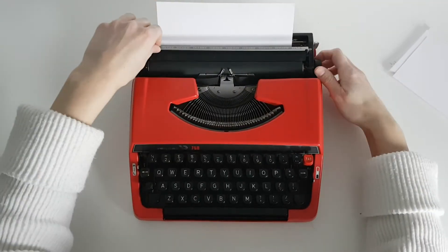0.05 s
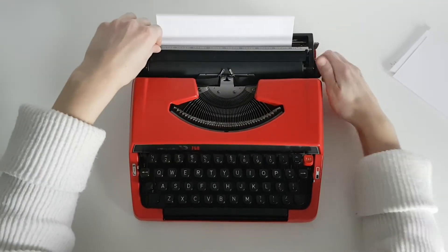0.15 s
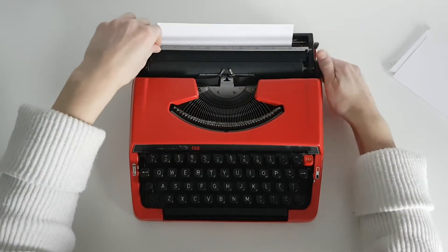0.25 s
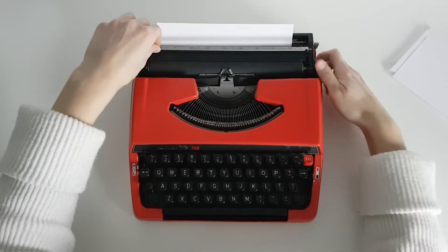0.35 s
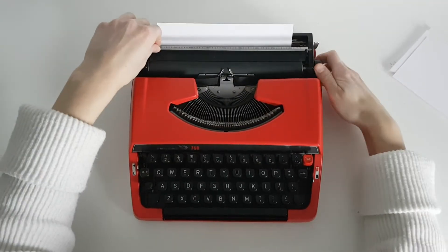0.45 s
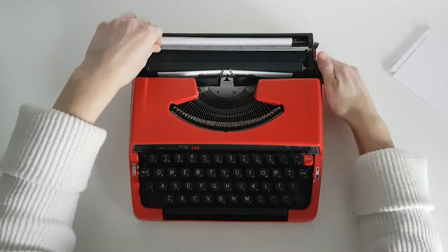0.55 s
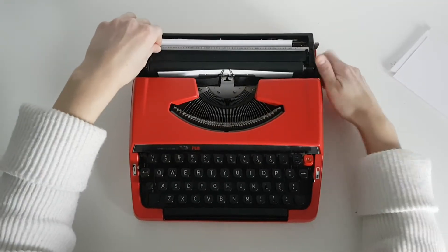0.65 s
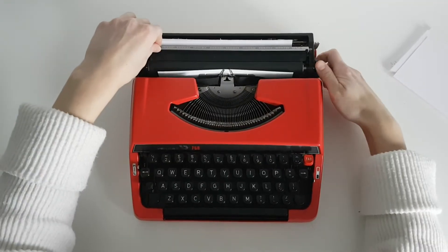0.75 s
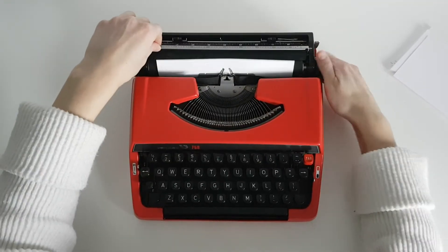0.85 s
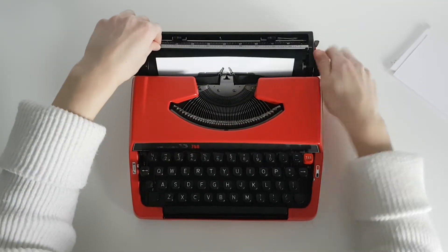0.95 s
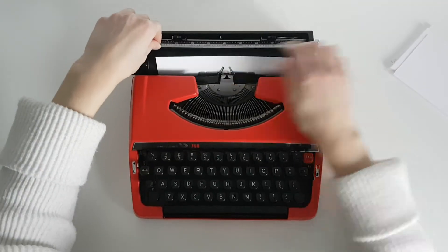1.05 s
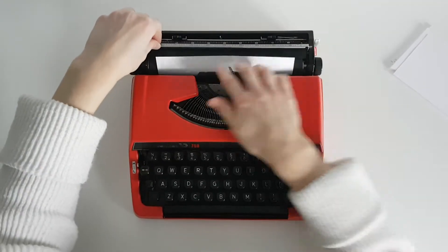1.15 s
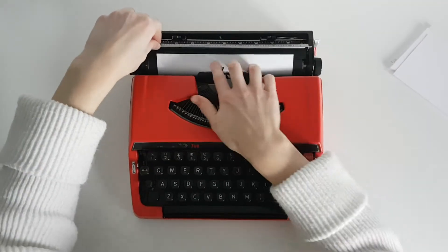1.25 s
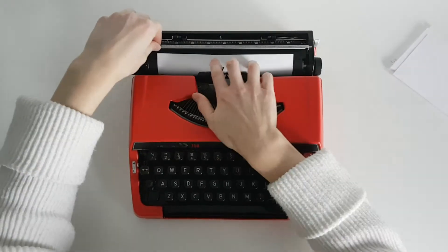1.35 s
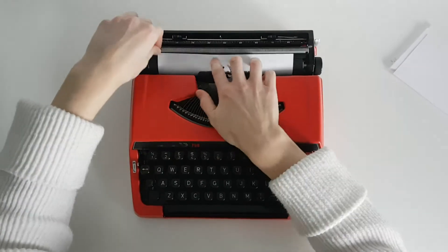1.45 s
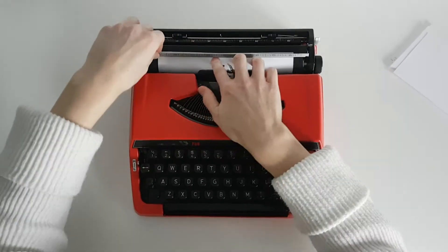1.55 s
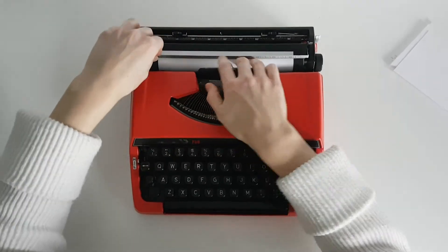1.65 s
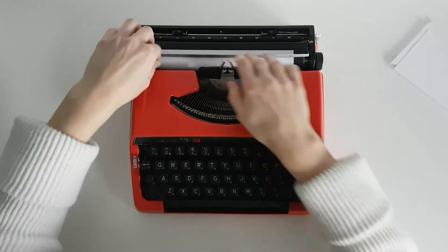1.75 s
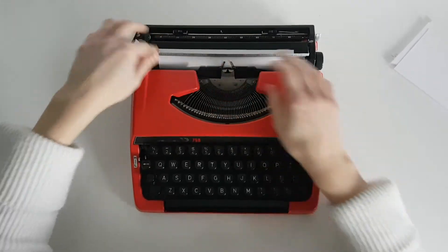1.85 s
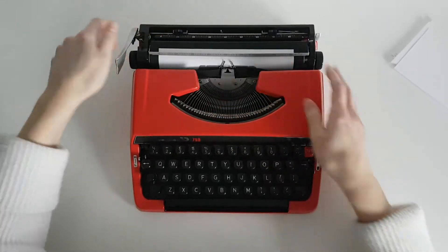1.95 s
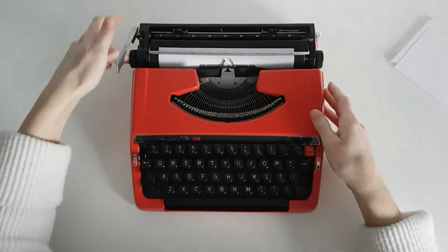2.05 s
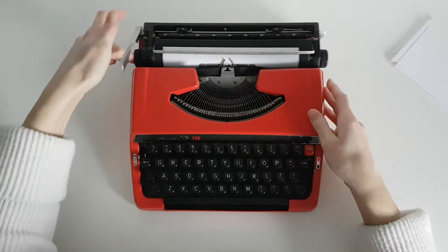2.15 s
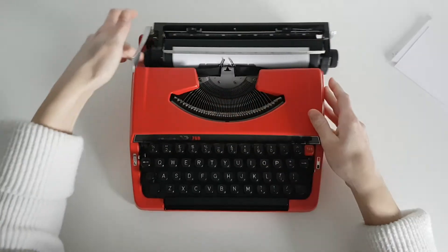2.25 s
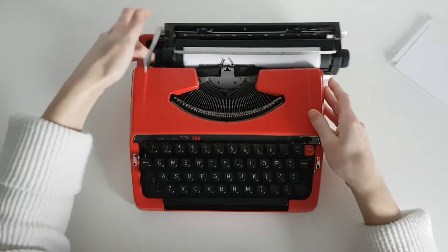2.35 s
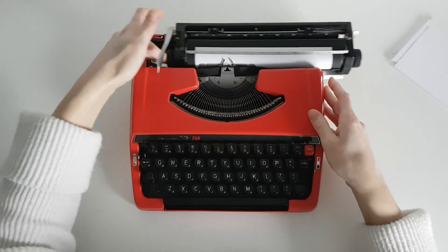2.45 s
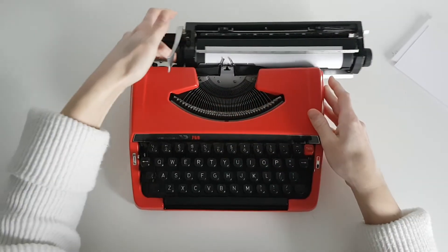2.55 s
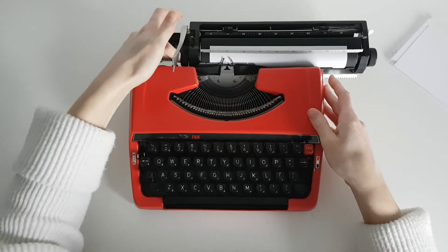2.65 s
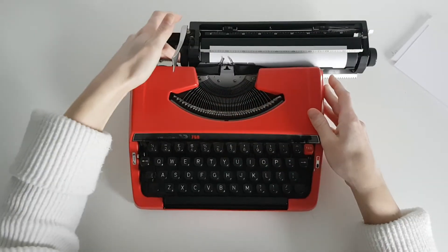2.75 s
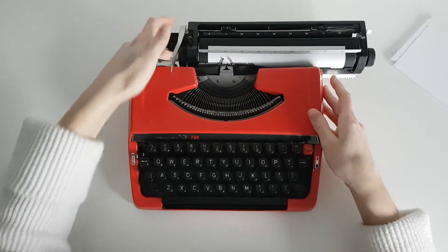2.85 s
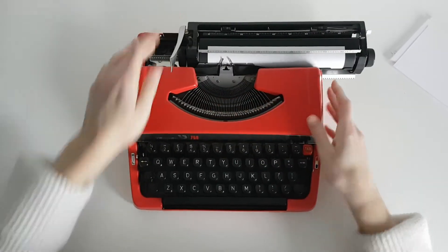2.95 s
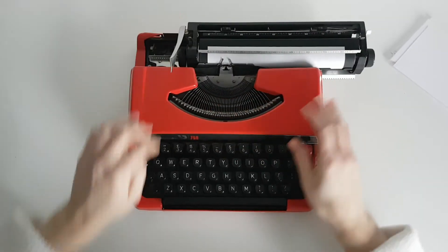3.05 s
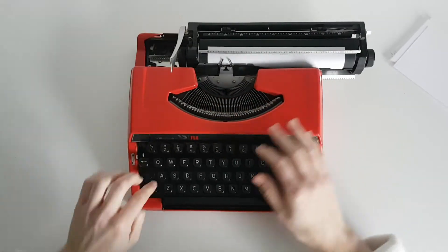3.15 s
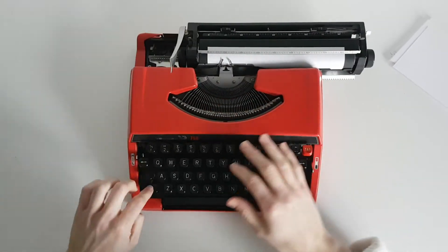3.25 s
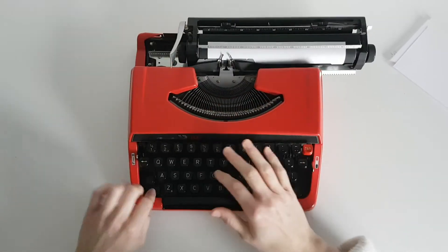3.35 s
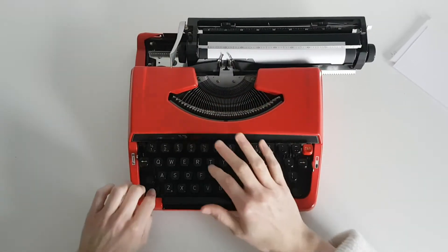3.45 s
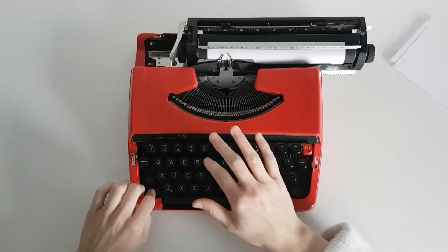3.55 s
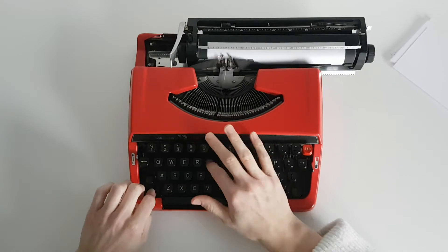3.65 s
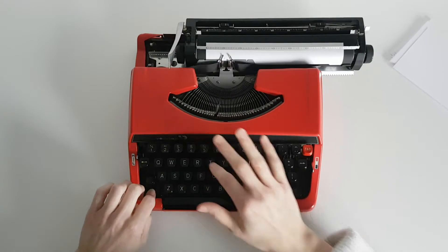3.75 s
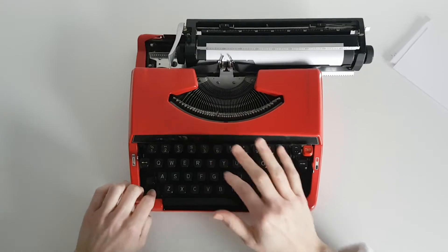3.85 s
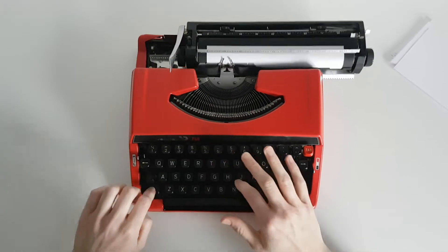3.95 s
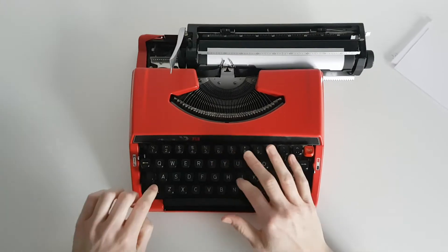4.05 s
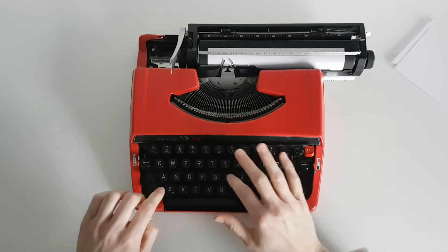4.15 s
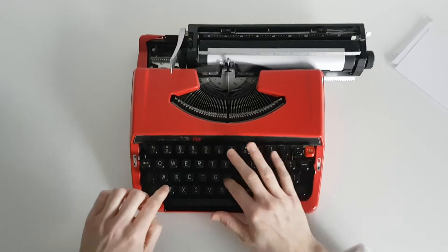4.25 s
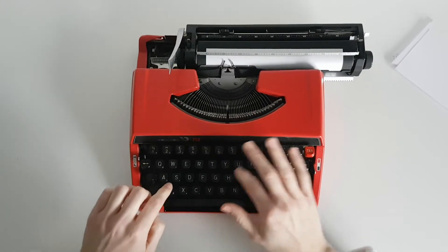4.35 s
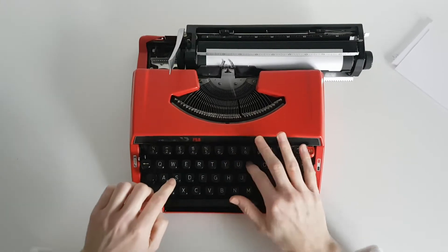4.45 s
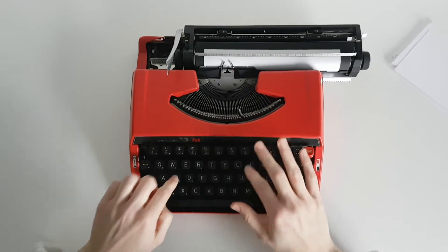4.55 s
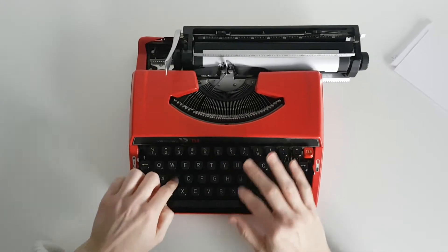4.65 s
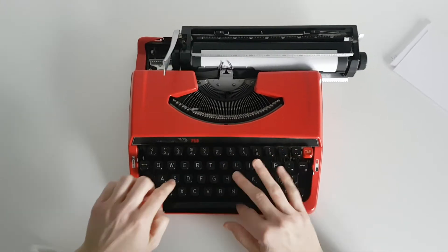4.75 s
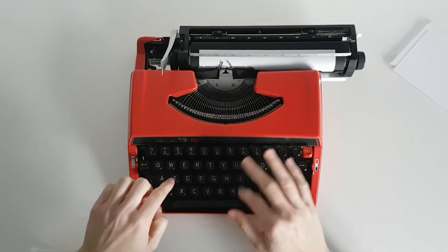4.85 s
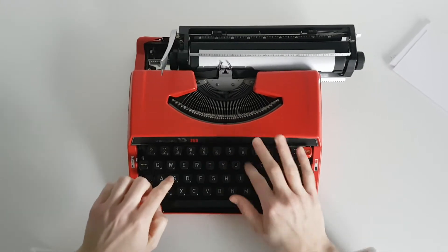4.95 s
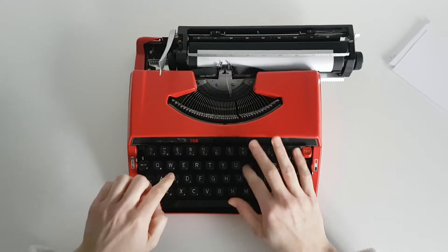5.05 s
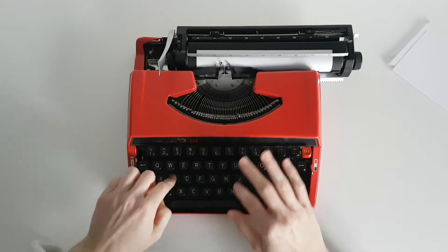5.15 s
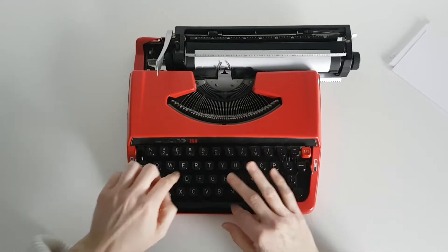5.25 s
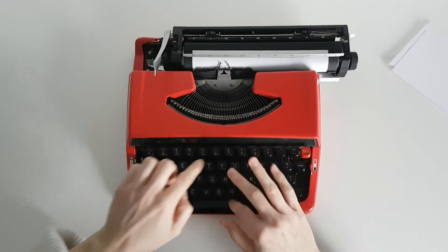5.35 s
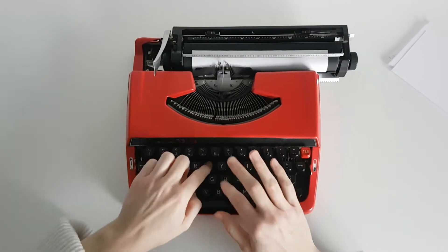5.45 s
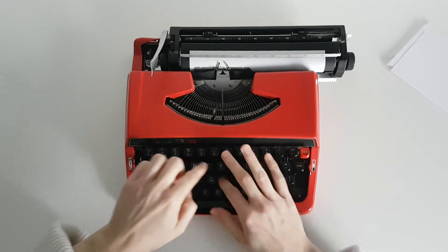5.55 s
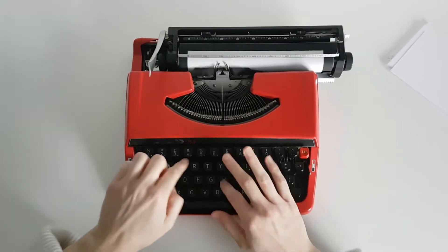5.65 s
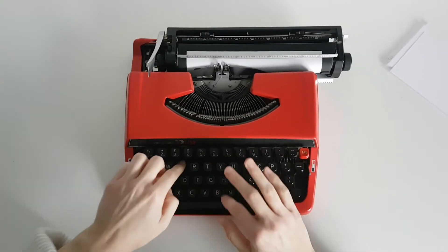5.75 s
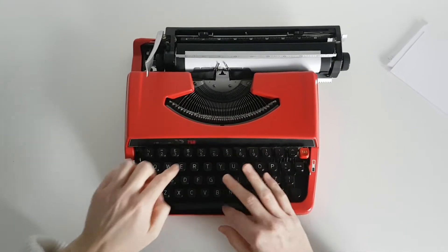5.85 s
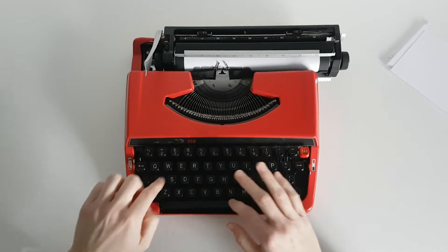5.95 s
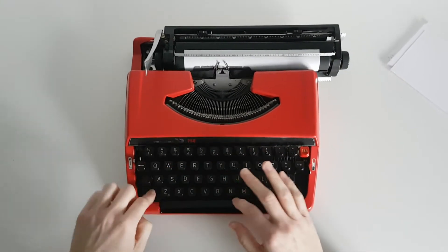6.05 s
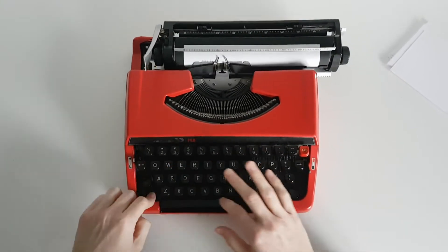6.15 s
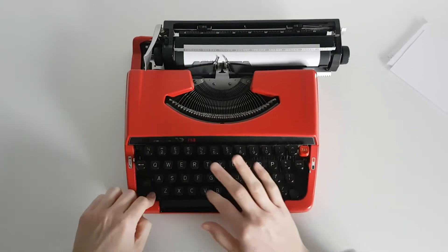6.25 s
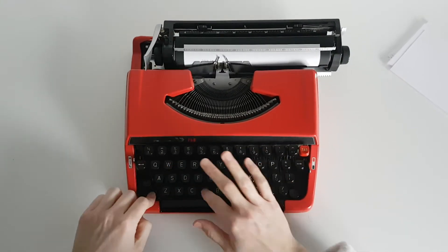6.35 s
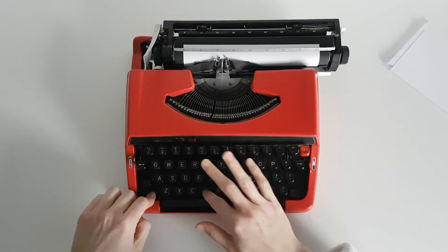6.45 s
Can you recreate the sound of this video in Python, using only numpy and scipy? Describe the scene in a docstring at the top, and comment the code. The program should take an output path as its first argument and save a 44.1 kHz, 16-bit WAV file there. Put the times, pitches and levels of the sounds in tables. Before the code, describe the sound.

Small room, close stereo microphone, faint air. Paper is rolled into a manual typewriter with three soft, rapid clicking twists, then sparse delicate taps of metal fittings and a quiet purring carriage slide. A heavy shift clunk starts the typing: one duller strike, a low desk thud, then eight sharp slaps at irregular spacing, with linkage rattle and woody metallic return knocks. Space bar clatters separate them; another shift clunk precedes one final hard strike.

```python
"""A small room with a portable manual typewriter on a desk, heard from close above.
Three twists of the platen knob click a pawl over ratchet teeth above a filtered-noise rumble, then the
paper bail is set and the carriage purrs along its rack to the margin. The shift key jolts a ringing
carriage. A run of letters follows, with spaces: noise-burst linkage rattles, a cracking slap on the
platen, then a ringing knock as the typebar falls back. Frame resonances and a short room bind it all."""
import sys
import numpy as np
from scipy import signal
from scipy.fft import rfft, irfft
from scipy.io import wavfile

SR = 44100
rng = np.random.default_rng(int(sys.argv[2]) if len(sys.argv) > 2 else 0)


def generate_wav(signal):
    """Clip the signal to [-1, 1] and save it as 16-bit WAV at the path in sys.argv[1]."""
    frames = np.transpose(np.atleast_2d(signal))
    scaled = np.clip(frames, -1, 1) * 32767
    pcm = np.round(scaled).astype(np.int16)
    wavfile.write(sys.argv[1], SR, pcm)


N = 286209
T = np.arange(SR // 3) / SR  # time axis of one short sound, s

# Levels in the event tables are relative: each layer adds its own trim and colour.
# twists of the platen knob: start t/s, length/s, level/dB, opening rate/teeth per s, rise/s
TWISTS = [(.151, .13, -28.5, 132, 0.023), (0.513, 0.12, -30, 122, .002), (0.8435, .08, -28.5, 130, .002)]
# letters: typebar hit t/s, hit level/dB, linkage level/dB, fall-back delay/s, landing level/dB
LETTERS = [(3.703, -24, -37.5, 0.064, -18.5), (4.2732, -10.5, -36, .089, -15),
           (4.495, -11, -36, 0.076, -17.5), (4.6457, -9, -29.5, 0.107, -23.5),
           (5.022, -12, -35.5, 0.0854, -17), (5.1847, -10.5, -29, 0.096, -22.5),
           (5.4834, -12, -36.5, .083, -17.5), (5.6072, -10, -36, 0.087, -16),
           (5.7448, -10.5, -35.5, 0.089, -22.5), (6.4314, -9, -34.5, .09, -19)]
# the space bar springs back: t/s, level/dB
SPACE_RELEASES = [(4.856, -26), (5.371, -26.5), (5.941, -26)]
# the shift key lifts the carriage against its stop: t/s, level/dB
SHIFT_LIFTS = [(3.393, -15.5), (6.158, -13)]
# the shift key lets the carriage drop, one row: t/s, level/dB
SHIFT_DROP = (4.0, -18.5)
# knocks of paper bail, carriage, lever and other loose fittings: t/s, level/dB, f/Hz of the fitting
FITTING_KNOCKS = [(1.234, -50, 1700), (1.265, -48.5, 780), (1.39, -60.5, 10000), (1.541, -47.5, 2200),
                  (1.562, -38.5, 1900), (1.687, -50.5, 2410), (2.131, -50, 3380), (2.652, -34.5, 3030),
                  (2.68, -39, 560), (2.863, -40.5, 4000), (2.955, -49.5, 1530), (3.288, -54.5, 278),
                  (3.369, -43.5, 1600), (4.422, -35, 2800), (6.079, -46, 6930)]
# a dry snap of the paper, one row: t/s, level/dB
PAPER_SNAP = (0.415, -42)
# hands resting on the machine make it rumble faintly, one row: start t/s, length/s, level/dB
HANDS_ON = (0, .98, -54.5)

# spectra, each scaled to unit energy in use: f/Hz, level/dB
# slug on platen
SLAP_SPECTRUM = [(60, -6.5), (400, -10.5), (900, -9.5), (1600, -3.5), (3800, 0.5), (5000, -9), (7300, -9.5),
                 (9000, -20), (12000, -17), (16000, -30)]
# typebar on its rest
REST_SPECTRUM = [(60, 0.5), (350, -8.5), (700, -3), (1100, -2), (2800, -4), (4200, -15.5), (7500, -22.5),
                 (9500, -28.5), (15000, -22.5)]
# key linkage
LINKAGE_SPECTRUM = [(60, 9.5), (350, 1.5), (1000, -1), (3800, -1), (6500, -4.5), (9500, -11), (15000, -6)]
# space bar and escapement
SPACE_SPECTRUM = [(60, 3.5), (350, 1), (600, 1), (1100, 1), (1900, -6.5), (4300, -4), (6000, -15.5),
                  (8000, -12), (9800, -26), (14000, -19.5)]
# shifted carriage
CARRIAGE_SPECTRUM = [(60, 3), (230, 7), (350, -1), (700, 1.5), (1400, -2), (2000, -5.5), (3700, -6),
                     (6000, -15), (9500, -21.5), (13000, -20)]
# pawl on the platen ratchet
PAWL_SPECTRUM = [(100, 3), (400, -6.5), (1100, -2), (1700, -9.5), (2400, -0.5), (3000, -7), (4400, -5.5),
                 (5500, -3), (8500, -11), (13000, -9)]
# touched fittings
TOUCH_SPECTRUM = [(60, 3.5), (200, 7.5), (400, 0.5), (1500, 2.5), (3400, -2.5), (5500, -7), (9500, -13),
                  (12500, -15.5)]
# snapping paper
PAPER_SPECTRUM = [(100, -25), (8000, -17), (12000, 8), (16000, -14)]
# pawl on the carriage rack
RACK_SPECTRUM = [(80, 12), (400, -4), (900, 1.5), (2000, -1.5), (3000, 4), (4500, -11.5), (10000, -27.5)]
# rolling parts and the thud under a knock
RUMBLE_SPECTRUM = [(25, -20), (75, 4), (140, -4.5), (280, -9), (600, -24), (3000, -48)]
# still air
AIR_SPECTRUM = [(25, -9.5), (70, 3), (200, -8), (1000, -15), (3200, -18), (9000, -37), (15000, -29.5)]

# ringing of a landed typebar, before its own pitch factor: f/Hz, level/dB, t60/s
REST_MODES = [(1037, -2.5, 0.066), (1610, -1, 0.013)]
# ringing of the carriage against its stop: f/Hz, level/dB, t60/s
STOP_MODES = [(68, -1, .13), (185, -8, .09), (235, -6, .09), (562, 7.5, .06)]
# ringing of the dropped carriage through the desk: f/Hz, level/dB, t60/s
DROP_MODES = [(66.36, -4.5, .15), (85.64, 0, 0.145), (138, -3.5, 0.068), (225, -6.5, 0.116)]
# resonances of the frame, fed by every contact: f/Hz, width/Hz, boost/dB
FRAME_RESONANCES = [(68.5, 5.33, -1.5), (81.5, 8.3, -1), (143.2, 12.3, -3), (200.6, 58, -6), (575, 14, 3.5),
                    (720.5, 35.1, -0.5), (1065, 27, -1)]
# resonances of the ratchet wheel: f/Hz, width/Hz, boost/dB
WHEEL_RESONANCES = [(1100, 130, 2), (3740, 260, 11), (5400, 500, -3)]
# room decay: f/Hz, t60/s
ROOM_DECAY = [(60, 0.49), (400, 0.48), (1100, 0.4), (3000, 0.3065), (7700, 0.32), (15000, 0.19)]
# stereo width: f/Hz, side gain level/dB
SIDE_GAIN = [(60, -15.5), (150, -19), (300, -10.5), (600, -10), (1300, -3), (2700, -3), (5000, 0),
             (15000, 0.5)]

AIR_DB, EDGE_HZ = -62.5, 16200  # still air; upper band limit
TWIST_SLOWING, TWIST_FADE_DB = 0.22, -13.5  # share of rate and level lost by the end of a twist
# the knob ticks as the fingers let go after a twist starts, and grip again before the next
LET_GO_S, GRIP_S, KNOB_DB, KNOB_HZ = 0.175, 0.023, -53, 2980
# rumble of the turning platen; every rolling part rises and runs on alike
PLATEN_ROLL_DB, ROLL_RISE_S, ROLL_T60_S = -43.5, 0.035, 0.31
PUSH_S, PUSH_LENGTH_S, PUSH_ROLL_DB = 2.15, 0.47, -55  # the carriage is pushed to its margin
SLIDE_DB, SLIDE_TEETH_PER_S = -50, 72  # its pawl on the rack
# share of the push at which the slide is loudest; level of its two ends against that peak
SLIDE_PEAK, SLIDE_START_DB, SLIDE_END_DB = 0.58, -12, -7.5
KEY_TRAVEL_S = 0.0375  # from pressing a key to the hit
HARD_DB, SOFT_DB = -12, -28  # table levels of a clean crack and of a dull rattle
LANDING_TILT_DB = 0.6  # brightness of a landing typebar, dB per octave
SPACE_HELD_S, SPACE_PRESS_DB = 0.076, -6.5  # the press comes this much earlier and softer
# small fittings are brighter: dB per octave for each octave of pitch above FITTING_HZ
FITTING_HZ, FITTING_TILT_DB = 2200, 0.96
THUD_DB, THUD_T60_S = -10.5, 0.28  # each knock also jogs the carriage


def amp(db):
    """Decibels to gain."""
    return 10 ** (np.asarray(db) / 20)


def read(points, hz):
    """Reads a value from a table of (f/Hz, value) on a log-frequency axis."""
    f, value = np.transpose(points)
    return np.interp(np.log(hz + 1), np.log(f), value)


def add(mix, s, sound):
    """Mixes a mid-side sound in at s seconds."""
    part = mix[:, max(round(s * SR), 0):][:, :sound.shape[1]]
    part += sound[:, :part.shape[1]]


def fade(t60, t=T):
    """Exponential decay that falls by 60 dB in t60 seconds."""
    return np.exp(-np.log(1000) * t / t60)


def clatter(shape):
    """Countless small parts sounding together: noise under an envelope, equal in mid and side."""
    noise = rng.standard_normal((2, len(shape))) * shape
    return noise * np.linalg.norm(shape) / np.linalg.norm(noise, axis=1, keepdims=True)


def colour(x, spectrum, tilt_db=0, size=2048):
    """Minimum-phase filter of unit energy with the given spectrum, tilted in dB per octave."""
    hz = abs(np.fft.fftfreq(size, 1 / SR))
    gain = amp(read(spectrum, hz) + tilt_db * np.log2(np.clip(hz, 100, 8000)))
    gain = gain / np.sqrt(np.mean(gain ** 2))
    response = np.exp(signal.hilbert(np.log(gain)).conj())
    taps = np.fft.ifft(response).real[:size // 2]
    return signal.fftconvolve(x, taps[None], axes=1)[:, :x.shape[1]]


def resonate(x, modes):
    """Parts ring on at their own pitches after whatever shakes them; wider modes die sooner."""
    rings = 0
    for hz, width, db in modes:
        decay = np.exp(-np.pi * width * T)
        rings = rings + amp(db) * 2 * np.pi * width / SR * decay * np.cos(2 * np.pi * hz * T)
    return x + signal.fftconvolve(x, rings[None], axes=1)[:, :x.shape[1]]


def ring(modes, pitch=1, rise=0.00744):
    """Damped sines of one struck part, swelling briefly, in the middle of the image."""
    mid = sum(amp(db) * fade(t60) * np.sin(2 * np.pi * hz * pitch * T) for hz, db, t60 in modes)
    return np.array([mid * (1 - fade(rise)), 0 * mid])


def ratchet(rows, spectrum, tooth_t60, uneven_db):
    """A pawl drops into one tooth after another at the speed of the hand."""
    s, rate, db = np.transpose(rows)
    t = np.arange(s[0], s[-1], 1 / SR)
    teeth = np.floor(np.cumsum(np.interp(t, s, rate)) / SR)
    out = np.zeros((2, N))
    for at in t[np.diff(teeth, prepend=-1) > 0]:
        size = amp(np.interp(at, s, db) + uneven_db * rng.standard_normal())
        add(out, at, size * clatter(fade(tooth_t60)[:SR // 20]))
    return colour(out, spectrum)


def still_air():
    """Steady coloured noise beneath everything."""
    return amp(AIR_DB) * colour(clatter(np.ones(N)), AIR_SPECTRUM)


def rolling(start, length, db):
    """Envelope of a rumble: it builds up, holds while the part moves and dies away."""
    t = np.arange(N) / SR - start
    return amp(db) * np.clip(t / ROLL_RISE_S, 0, 1) * fade(ROLL_T60_S, np.maximum(t - length, 0))


def rumble():
    """Resting hands, the turning platen and the moving carriage shake the body: low noise."""
    level = rolling(*HANDS_ON) + rolling(PUSH_S, PUSH_LENGTH_S, PUSH_ROLL_DB)
    for start, length, *_ in TWISTS:
        level = level + rolling(start, length, PLATEN_ROLL_DB)
    return amp(-7) * colour(clatter(level), RUMBLE_SPECTRUM)


def room(x, gap_s=0.0033, thin_hz=110):
    """Dense reflections build up after a short gap; treble dies first and little bass comes back."""
    hz, t, z = signal.stft(rng.standard_normal((2, SR // 2)), SR, nperseg=256)
    tail = signal.istft(z * fade(read(ROOM_DECAY, hz)[:, None], t), SR, nperseg=256)[1]
    after_gap = np.maximum(np.arange(tail.shape[1]) / SR - gap_s, 0)
    tail = tail * (1 - fade(0.014, after_gap))
    tail = signal.lfilter(*signal.butter(1, thin_hz, "high", fs=SR), tail)
    return signal.fftconvolve(x[:1], tail / np.linalg.norm(tail[0]), axes=1)[:, :N]


def twist(start, length, db, rate, rise):
    """One turn of the wrist as (t/s, teeth per s, level/dB): quick, then slower and softer."""
    u = np.linspace(0, 1, 30)  # share of the twist
    swell_db = -8 * np.maximum(1 - u * length / rise, 0)
    level_db = db + swell_db + TWIST_FADE_DB * u ** 2
    return np.transpose([start + u * length, rate * (1 - TWIST_SLOWING * u), level_db])


def platen_clicks():
    """The platen clicks round as its pawl drops over the teeth of a ringing ratchet wheel."""
    clicks = sum(ratchet(twist(*row), PAWL_SPECTRUM, tooth_t60=0.0354, uneven_db=2) for row in TWISTS)
    return amp(-3) * resonate(clicks, WHEEL_RESONANCES)


def handling(width=0.35, boost_db=5):
    """Light knocks on loose fittings, each with a short ring at its own pitch and a soft thud."""
    let_go = [start + LET_GO_S for start, *_ in TWISTS]
    grip_again = [start - GRIP_S for start, *_ in TWISTS[1:]]
    knob_ticks = [(s, KNOB_DB, KNOB_HZ) for s in let_go + grip_again]
    out = np.zeros((2, N))
    for s, db, hz in FITTING_KNOCKS + knob_ticks:
        tilt_db = FITTING_TILT_DB * np.log2(hz / FITTING_HZ)
        shape = fade(0.043) + amp(-11.5) * fade(0.136)
        knock = colour(clatter(shape), TOUCH_SPECTRUM, tilt_db)
        thud = colour(clatter(fade(THUD_T60_S)), RUMBLE_SPECTRUM)
        add(out, s, amp(db - 3) * resonate(knock, [(hz, width * hz, boost_db)]))
        add(out, s, amp(db + THUD_DB) * thud)
    return out


def paper_snap():
    """The sheet snaps: one very short burst of bright noise."""
    out = np.zeros((2, N))
    s, db = PAPER_SNAP
    add(out, s, amp(db) * colour(clatter(fade(0.0095)), PAPER_SPECTRUM))
    return out


def push():
    """One push of the carriage as (t/s, teeth per s, level/dB): it swells, then is eased off."""
    shape = (0, SLIDE_START_DB), (SLIDE_PEAK, 0), (1, SLIDE_END_DB)
    return [(PUSH_S + u * PUSH_LENGTH_S, SLIDE_TEETH_PER_S, SLIDE_DB + db) for u, db in shape]


def carriage_slide():
    """The carriage purrs to its margin as a pawl runs along the rack."""
    return amp(-1) * ratchet(push(), RACK_SPECTRUM, tooth_t60=0.071, uneven_db=1.5)


def shift(travel_s=0.0096):
    """The carriage is jerked up and rings against its stop; let go, it thuds through the desk."""
    out = np.zeros((2, N))
    jolt = (1 - fade(0.016)) * fade(0.17)
    for s, db in SHIFT_LIFTS:
        add(out, s, amp(db - 7) * colour(clatter(jolt), CARRIAGE_SPECTRUM))
        stop = colour(clatter(jolt), CARRIAGE_SPECTRUM, tilt_db=-1)
        add(out, s + travel_s, amp(db - 7) * (ring(STOP_MODES) + amp(-1) * stop))
    s, db = SHIFT_DROP
    drop = colour(clatter(jolt), CARRIAGE_SPECTRUM, tilt_db=0.97)
    add(out, s, amp(db) * (drop - ring(DROP_MODES)))
    return out


def letters(rebound_s=0.0052, rebound_db=-8, crack=3.7, shiver_db=-19):
    """The linkage rattles, louder as the bar nears the ribbon; the slug cracks on the platen and rebounds."""
    out = np.zeros((2, N))
    late = T - KEY_TRAVEL_S  # time after the hit
    nearing = 0.64 + 0.3 * fade(0.0093) + 1.25 * fade(0.0578, abs(late))
    swing = (1 - fade(0.0048)) * fade(0.0636, np.maximum(late, 0)) * nearing
    for hit, db, linkage_db, *_ in LETTERS:
        tilt_db = 0.167 * (linkage_db + 34.5)  # a harder press rattles brighter
        rattle = colour(clatter(swing), LINKAGE_SPECTRUM, tilt_db)
        add(out, hit - KEY_TRAVEL_S, amp(linkage_db + 0.5) * rattle)

        hard = np.clip((db - SOFT_DB) / (HARD_DB - SOFT_DB), 0, 1)
        slap = clatter(hard * fade(0.01708) + (1 - hard) * fade(0.21) + amp(shiver_db) * fade(0.36))
        slap[0, 0] += crack * hard  # a single central impulse
        rebound = amp(rebound_db) * hard * clatter(fade(0.023))
        add(slap, rebound_s * rng.uniform(0.9, 1.15), rebound)
        add(out, hit, amp(db - 1.5) * colour(slap, SLAP_SPECTRUM))
    return out


def bend(x, lag_s, knee_hz):
    """Bending waves run along a steel bar: low pitches arrive later, so a knock chirps downward."""
    hz = np.fft.rfftfreq(x.shape[1], 1 / SR)
    delay = lag_s * knee_hz / np.maximum(hz, knee_hz)
    phase = 2 * np.pi * np.cumsum(delay) * hz[1]
    return irfft(rfft(x) * np.exp(-1j * phase), x.shape[1])


def returns(bounce_s=0.0077, bounce_db=-7):
    """Each typebar lands on its padded rest, bounces and rings briefly at a pitch of its own."""
    out = np.zeros((2, N))
    for hit, _, _, fall_s, db in LETTERS:
        knock = clatter((1 - fade(0.0071)) * (fade(0.031) + amp(-12) * fade(0.14)))
        add(knock, bounce_s * rng.uniform(0.64, 1.4), amp(bounce_db) * clatter(fade(0.044)))
        pitch = rng.uniform(0.88, 1.12)
        clack = colour(knock, REST_SPECTRUM, LANDING_TILT_DB) + amp(-1.5) * ring(REST_MODES, pitch)
        add(out, hit + fall_s, amp(db) * bend(clack, lag_s=0.005055, knee_hz=704.8))
    return out


def spaces():
    """The space bar works the escapement: a soft, drawn-out chatter on press and on release."""
    out = np.zeros((2, N))
    chatter = (1 - fade(0.00325)) * fade(0.13, np.maximum(T - 0.025, 0))
    for s, db in SPACE_RELEASES:
        for at, stroke_db in (s - SPACE_HELD_S, db + SPACE_PRESS_DB), (s, db):
            add(out, at, amp(stroke_db - 2.5) * colour(clatter(chatter), SPACE_SPECTRUM))
    return out


def scene():
    """The machine in its room, still air and a paper snap; bass is central and treble wide."""
    contacts = rumble() + platen_clicks() + handling() + carriage_slide()
    contacts = contacts + shift() + letters() + returns() + spaces()
    machine = resonate(contacts, FRAME_RESONANCES)
    mid, side = amp(0.5) * machine + amp(-5.5) * room(machine) + still_air() + paper_snap()
    side = irfft(rfft(side) * amp(read(SIDE_GAIN, np.fft.rfftfreq(N, 1 / SR))), N)
    return np.array([mid + side, mid - side])


def record(dry):
    """The microphone sheds the deepest bass; then a full-scale ceiling and a band limit."""
    dry = signal.sosfilt(signal.butter(2, 48, "high", fs=SR, output="sos"), dry)
    low_pass = signal.firwin(301, EDGE_HZ, window=("kaiser", 8), fs=SR)
    return signal.oaconvolve(np.clip(dry, -1, 1), low_pass[None], "same", axes=1)


dry = scene()
out = record(dry)
generate_wav(out)
```